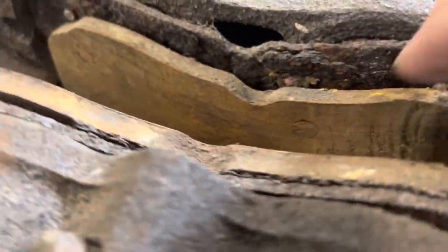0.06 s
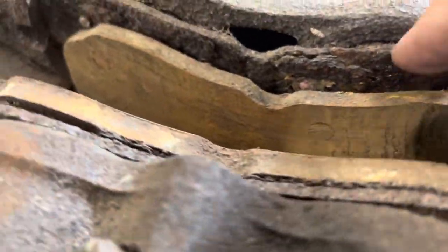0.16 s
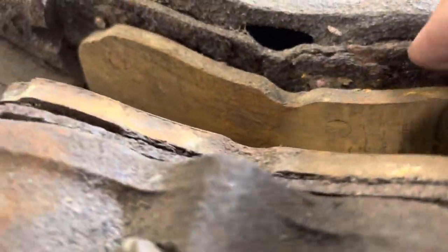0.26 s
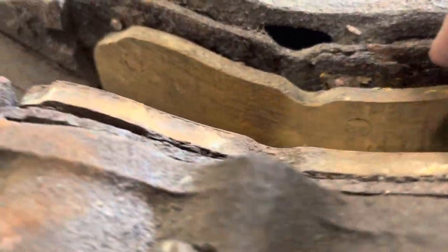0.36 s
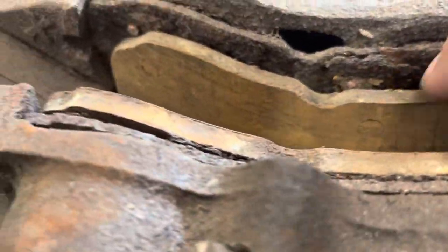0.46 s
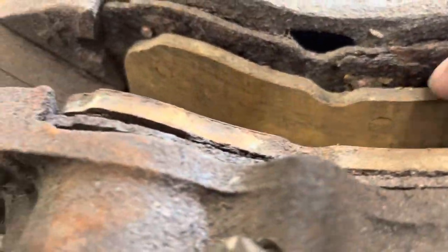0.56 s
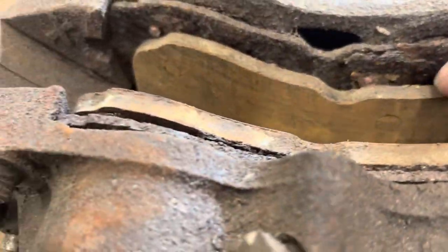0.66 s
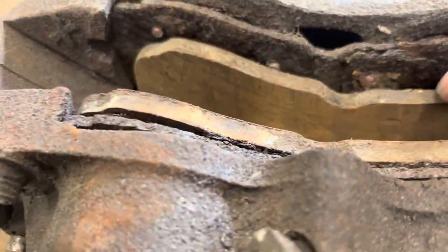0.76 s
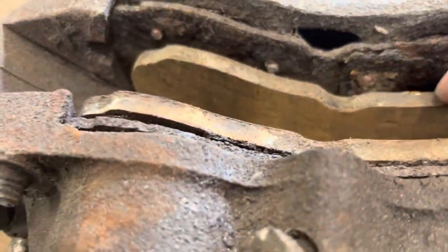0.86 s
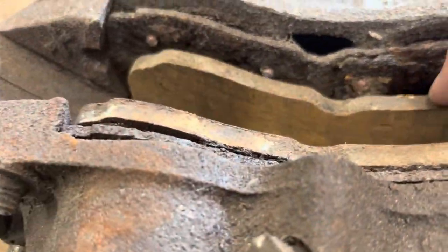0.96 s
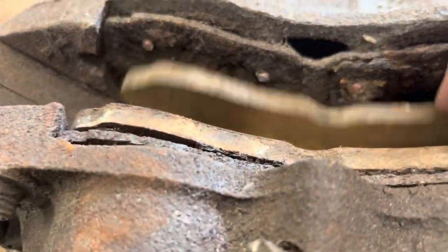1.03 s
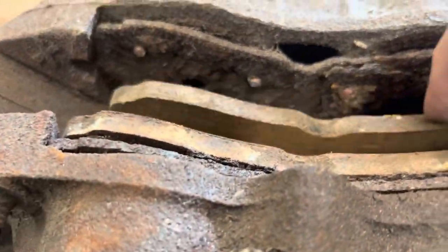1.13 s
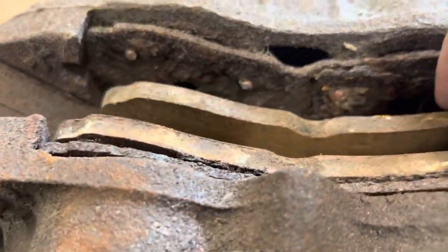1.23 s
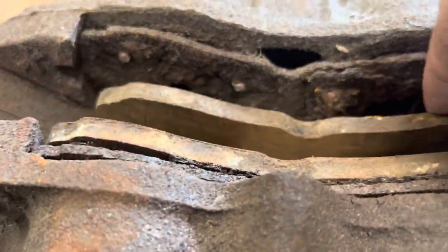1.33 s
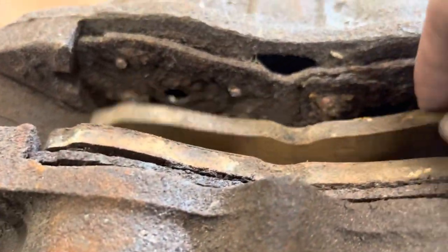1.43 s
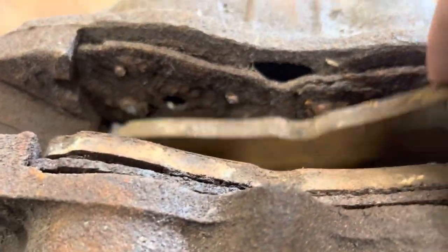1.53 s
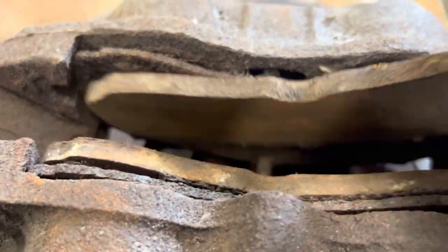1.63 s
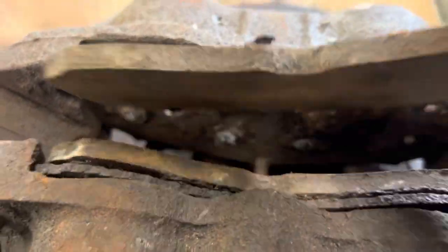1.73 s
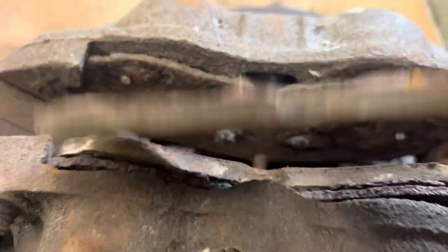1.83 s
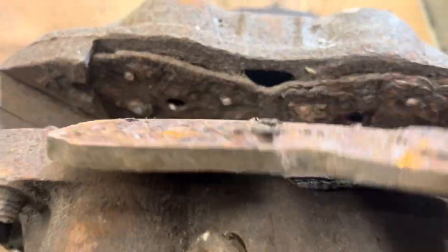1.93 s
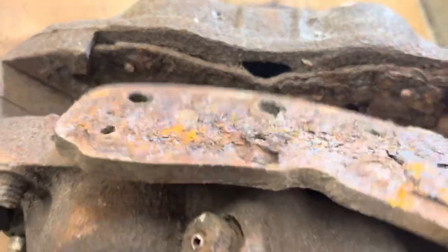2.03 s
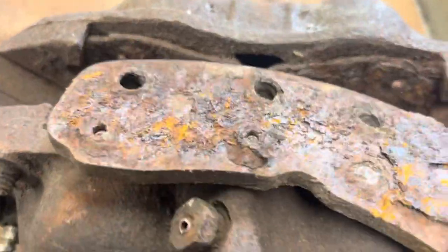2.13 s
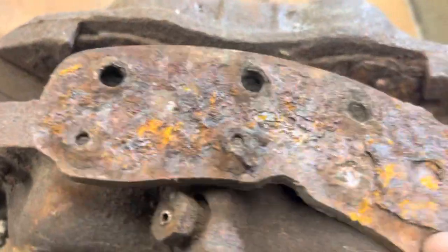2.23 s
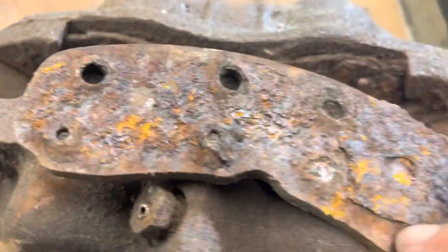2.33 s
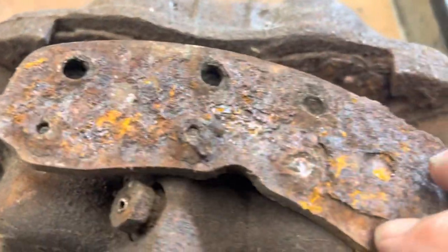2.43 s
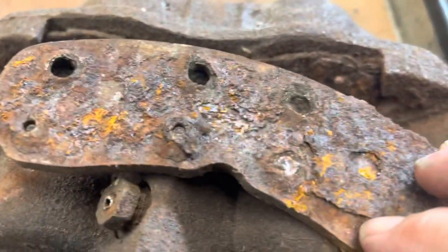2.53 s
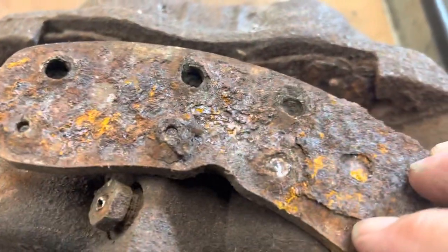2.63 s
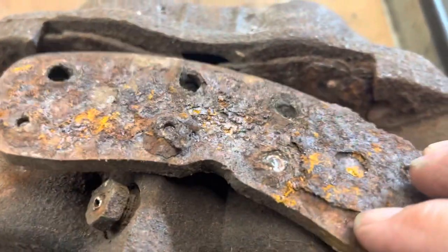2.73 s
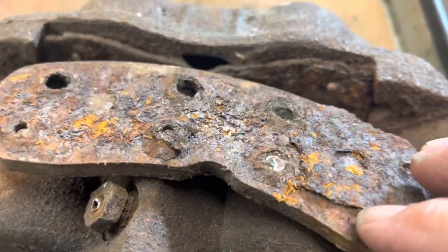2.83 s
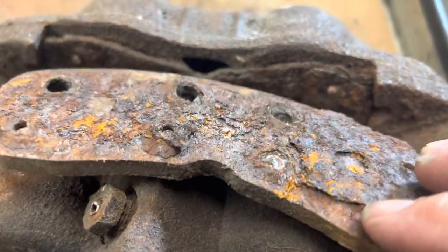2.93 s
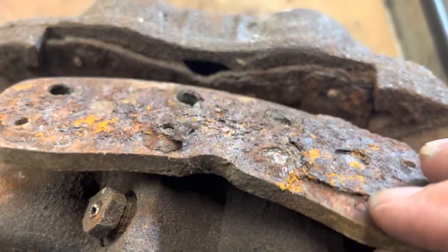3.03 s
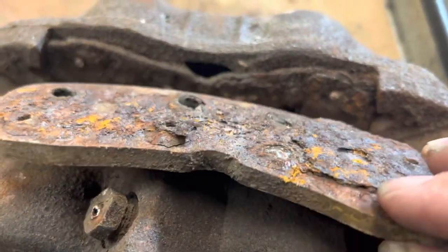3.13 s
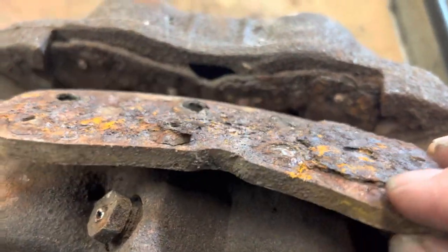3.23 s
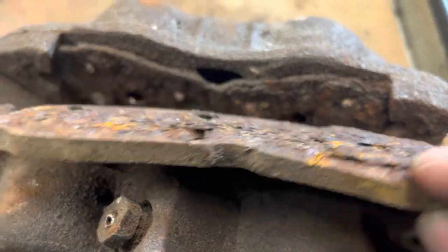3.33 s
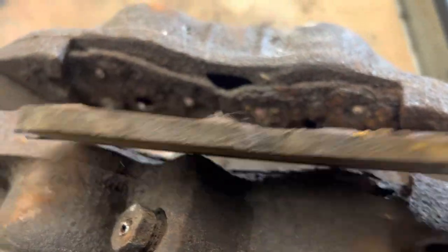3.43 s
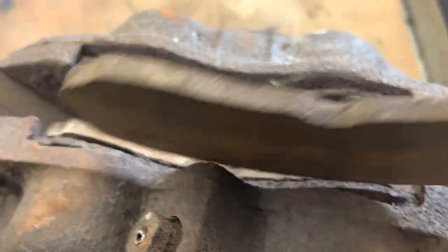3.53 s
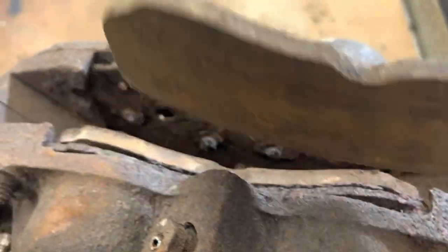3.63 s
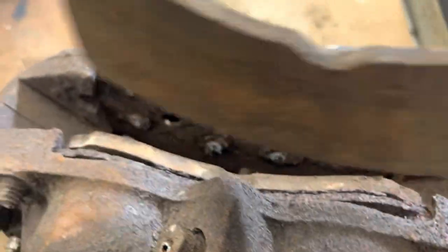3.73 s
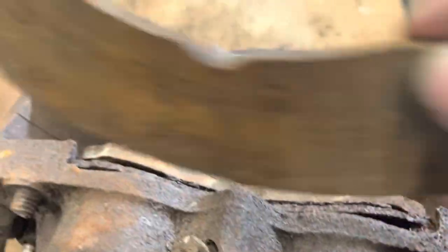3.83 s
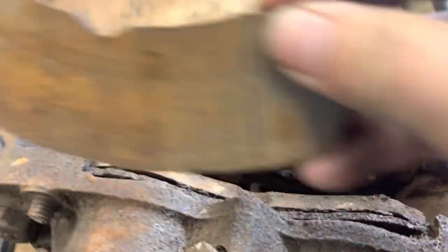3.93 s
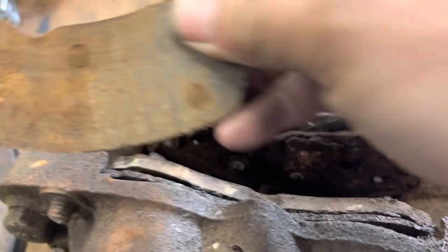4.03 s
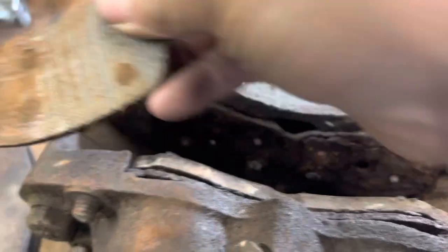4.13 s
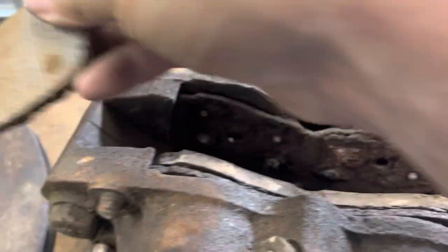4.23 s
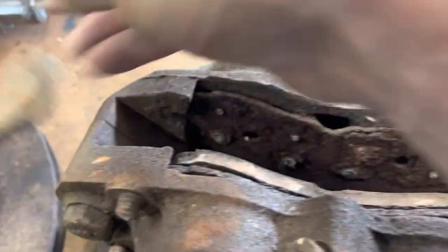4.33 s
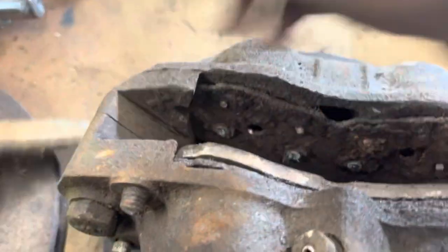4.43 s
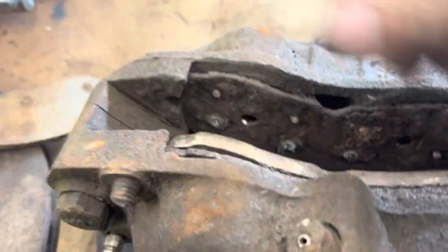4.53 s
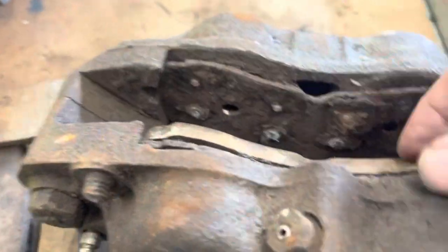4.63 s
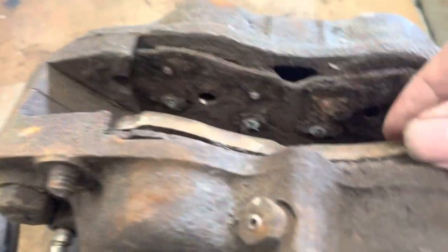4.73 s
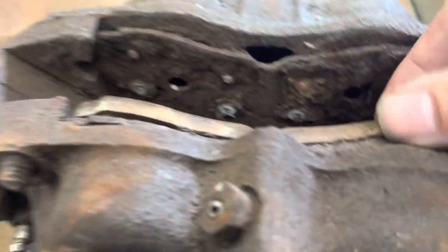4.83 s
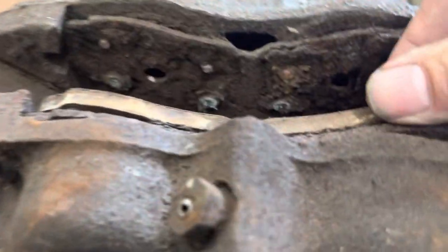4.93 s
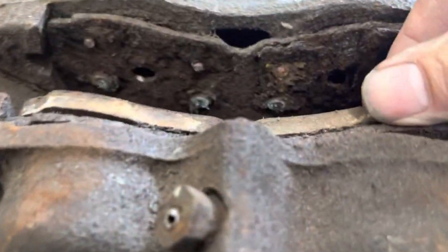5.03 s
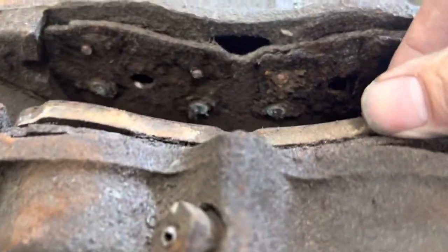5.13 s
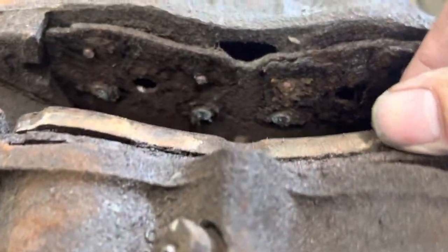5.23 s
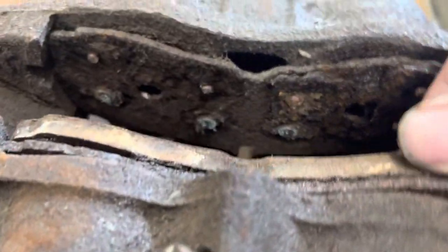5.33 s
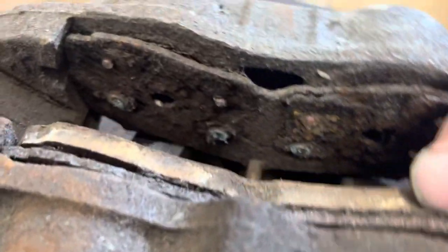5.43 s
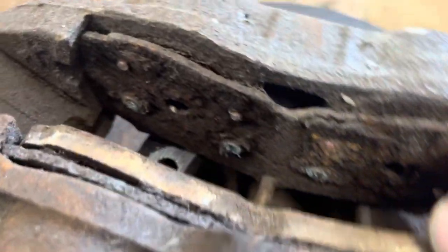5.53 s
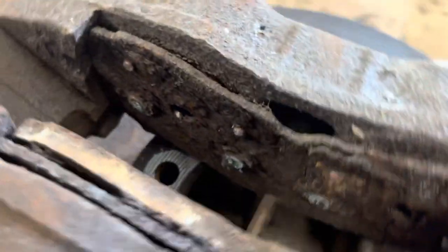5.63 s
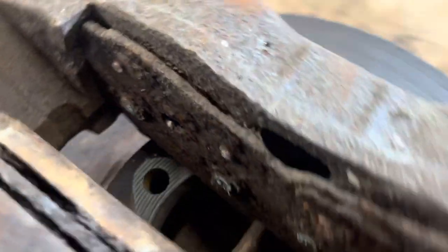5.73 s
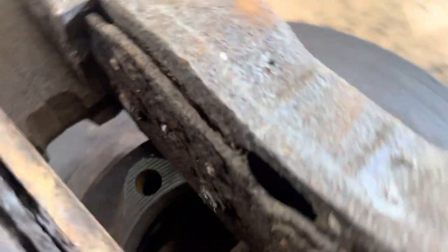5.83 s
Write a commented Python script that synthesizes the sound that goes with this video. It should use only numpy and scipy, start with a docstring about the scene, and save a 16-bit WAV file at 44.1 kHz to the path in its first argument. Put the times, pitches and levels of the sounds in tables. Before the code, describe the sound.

Small dry metal ticks and gritty rubs come from a hand-held pad right under the microphones, thickening into a cluster and one solid knock, then a few dull taps. After a mostly quiet gap the pad lands a little further off with a hard clack, a ringing second hit, quick rattles and a low bench thud. Faint touches end it over steady hum and hiss.

```python
"""A worn steel brake pad is worked out of a rusty caliper by hand: ticks, scrapes and dead knocks, close by.
It is then dropped on the bench, rings, chatters and comes to rest; a few light scrapes and taps follow.
Blows are noise sprays through resonant gains plus damped sine modes; scrapes are random grains, filtered.
A mains hum, low rumble and soft hiss run throughout."""
import sys
import numpy as np
from scipy import signal
from scipy.fft import rfft, irfft
from scipy.io import wavfile
from scipy.ndimage import uniform_filter1d

SR = 44100
rng = np.random.default_rng(int(sys.argv[2]) if len(sys.argv) > 2 else 0)


def file_out(sig):
    """Save sig as 16-bit WAV at sys.argv[1]."""
    # one column per channel
    cols = np.atleast_2d(sig).T
    # limit, then scale
    lim = np.clip(cols, -1, 1)
    pcm = np.round(lim * 32767).astype(np.int16)
    wavfile.write(sys.argv[1], SR, pcm)


N = 259043  # samples
HZ = np.fft.rfftfreq(4096, 1 / SR)  # grid of the filter gains
T = np.arange(SR * 3 // 5) / SR  # time after a blow [s]
# dropped pad lands: (time [s], clack level [dB], ring level [dB], ring centre [Hz],
# flatness [0 on edge to 1 on face], grit tick level [dB], thud level [dB])
PAD_LANDINGS = [(4.283, -11.5, -23.5, 3000, 0.033, -34, -18.5), (4.2955, -31, -39, 3000, .24, -42, -42),
                (4.3747, -13.5, -12, 1850, .95, -21, -17), (4.3825, -25, -45, 3500, 0.44, -28, -33),
                (4.4039, -15.5, -39, 3700, .99, -25.5, -31.5), (4.4557, -39, -42, 1500, 0.54, -54, -28),
                (4.4656, -40, -31, 2600, 0.82, -30.5, -47), (4.477, -50, -26.5, 2690, 0.74, -42, -44),
                (4.485, -41, -31, 2600, 0.76, -36, -20), (4.511, -57, -42.5, 1200, 1, -41, -54),
                (4.541, -42, -71, 2500, .4, -37, -26.5), (4.569, -37.5, -51, 1300, 0.49, -55, -36.5),
                (4.59, -52, -57, 1300, 0.82, -60, -33)]


def held_pad():
    """Fingers damp the pad: each tap is a dead knock, gritty tick and short ring; the casting thumps after."""
    # pad meets caliper: (time [s], knock level [dB], knock centre [Hz], grit tick level [dB],
    # ring level [dB], spot [0 at tip to 1 on flank])
    taps = [(0.285, -42, 1040, -58, -61, 0.78), (.691, -47, 676, -49, -50, .6),
            (.896, -40.5, 1330, -36.5, -59, .2), (0.915, -35, 1300, -32.5, -66, 0.12),
            (.942, -48, 1300, -40, -66, .2), (1.038, -45, 950, -43.5, -53, .9),
            (1.415, -56, 600, -42, -57, .5), (1.517, -58, 900, -36.5, -45.5, 0.63),
            (1.5497, -51, 700, -38.5, -46.5, 0.77), (1.585, -43, 910, -39, -49, 0.49),
            (1.6006, -34.5, 1150, -35, -32.5, 0), (1.636, -46, 1400, -45, -55, 0.33),
            (1.8489, -21.5, 774, -30, -36, 1), (1.968, -45, 500, -33, -55, .5),
            (1.9711, -33, 333, -46, -40, 0.75), (2.021, -35.5, 450, -55, -57, 0.78),
            (2.2326, -38.5, 1060, -45.5, -51, 0.73), (2.259, -32.5, 373, -51, -51, .9),
            (2.28, -47, 700, -58, -64, .8), (2.292, -41.5, 520, -56, -60, 0.71),
            (2.762, -38, 520, -48, -52, .6), (3.504, -41.5, 597, -51, -53, 0.75),
            (5.25, -46, 1400, -45.5, -62, 0.51), (5.401, -44.5, 400, -66, -58, .8)]
    # pad and casting pressed together: (frequency [Hz], level at tip [dB], level on flank [dB], t60 [s])
    joint_modes = [(231, -21, -5, .1), (400, -13, -9, .07), (592, -37, -8.5, 0.072),
                   (730, -5.5, -1.5, 0.082), (946, -33, -7.5, 0.082), (1086, -38, -11, 0.065),
                   (1390, -5, -8, 0.064), (1457, 4.5, -20, 0.04), (1705, 2.5, -27, 0.04),
                   (2363, -33, 7.5, 0.038), (2510, -16, -6.5, 0.096), (3800, 3.5, -26, 0.032),
                   (4370, -10, 1, 0.028), (5700, -9, -33, 0.033), (8200, -20, -8, 0.04),
                   (10300, 9.5, -21, 0.014)]
    lead = [(0, -2), (1550, -1.55), (3100, -8), (7490, -7), (13900, 4.5), (16500, 4)]  # stereo phase: (frequency [Hz], left lead [rad])
    side = [(60, -5), (150, 11), (380, 1), (950, 2), (2380, -3.5), (5980, -6), (15000, 5)]  # stereo level: (frequency [Hz], left over right [dB])
    # a glancing tap, more tick than knock, sounds brighter
    even_tick_hz, tick_db_per_octave = 6460, 27
    # the heavy casting rocks after each knock; a duller knock pushes it more
    thump_hz, thump_t60_s, thump_lag_s = 340, 0.14, 0.012
    thump_re_1khz_knock_db, thump_db_per_octave = -18, 6

    out = np.zeros((2, N))
    hz, tip_db, flank_db, t60_s = np.transpose(joint_modes)
    for s, knock_db, knock_hz, tick_db, ring_db, spot in taps:
        knock = contact(hump(knock_hz, q=0.86) ** 2, t60=0.028, likeness=0.88, tail_db=-27, tail_t60=0.11)
        mode_db = 20 * np.log10(blend(amp(tip_db), amp(flank_db), spot))
        clink = ring(hz, ring_db + mode_db, t60_s)
        tick_hz = even_tick_hz * 2 ** ((tick_db - knock_db) / tick_db_per_octave)
        grit = tick(tick_hz, t60=0.014)
        add(out, s, amp(knock_db) * knock + amp(tick_db) * grit + clink)

        thump = contact(hump(thump_hz, q=0.93) ** 2, thump_t60_s, likeness=0.94, tail_db=-24, tail_t60=0.18)
        duller_octaves = np.log2(1000 / knock_hz)
        thump_db = knock_db + thump_re_1khz_knock_db + thump_db_per_octave * duller_octaves
        add(out, s + thump_lag_s, amp(thump_db) * thump)
    return place(out, lead, side)


def scrapes():
    """Sliding steel catches on many rust grains of uneven size, which excite one resonance of the joint."""
    # slides over rust: (time [s], length [s], level [dB rms over sound and equal tail, plus 3], centre [Hz])
    rubs = [(.156, 0.064, -54, 990), (0.404, 0.044, -55, 3140), (0.416, 0.054, -52.5, 367),
            (0.557, .19, -55, 1980), (0.683, 0.017, -43, 694), (.932, 0.14, -60, 1490),
            (1.014, .018, -48.5, 3270), (2.075, .15, -59, 7000), (2.255, .09, -53.5, 1130),
            (3.409, 0.076, -57, 5000), (4.822, 0.066, -65, 2200), (5.401, 0.066, -60, 785),
            (5.604, 0.062, -54.5, 1210), (5.827, 0.042, -57.5, 1840)]
    # a slide of slip_s has Q 1; shorter slips stay on one spot and squeak more sharply
    slip_s, slip_power = 0.08, 1.22
    grains_per_s, grain_spread_db = 1500, 3.5
    catch_rms_db, catch_hz = 1.5, 70  # catch and slip: depth and rate of the unevenness

    out = np.zeros((2, N))
    catching = amp(catch_rms_db * drift(catch_hz))
    for s, length_s, db, hz in rubs:
        size = round(length_s * SR)
        q = (slip_s / length_s) ** slip_power
        grains = noise_pair(size, 0.3)
        hits = rng.random(size) < grains_per_s / SR
        grains *= hits * signal.windows.tukey(size, .6)
        grains *= amp(grain_spread_db * rng.standard_normal(size))
        grains *= np.roll(catching, -round(s * SR))[:size]
        with_tail = np.pad(grains, ((0, 0), (0, size)))
        sound = colour(with_tail, hump(hz, q) ** 2)
        add(out, s, amp(db) * unit(sound) / np.sqrt(2))
    return out


def dropped_pad():
    """Let go, the pad lands on its edge, falls on its face and chatters to rest, ringing freely."""
    # free pad: (frequency [Hz], level struck on edge [dB], level struck on face [dB], t60 [s])
    pad_modes = [(950, -18, -28, 0.046), (1106, -24, -17, .3), (1114, -20, 3, .15), (1117, -20, -9, .38),
                 (1613, -8, -16, 0.14), (1696, -16, -39, 0.45), (2250, -14, -22, 0.07),
                 (2411, -14, -2.5, .21), (2435, -30, -9, .25), (2812, 1, -17, .33), (2953, -1, -19, .19),
                 (2460, -28, -21, 0.054), (3420, -17, -33, 0.1), (3580, -27, -27, 0.11),
                 (3980, -32, -6, .11), (4180, -22, -14, .06), (4290, -10, -19, 0.09), (5340, -20, -9, 0.22),
                 (5800, -4.5, -24, 0.33), (5930, -20, -25, .25), (6205, -5, -29, 0.41),
                 (6450, -16, -23, 0.13), (7100, -13, -17, 0.25), (8160, -16, 0, 0.06)]
    # steel and bench touching: (frequency [Hz], width [Hz], level on edge [dB], level on face [dB])
    clack_modes = [(800, 75, -2.5, -7), (896, 42, -2, 5.5), (1490, 280, -11, -12), (2226, 120, -.5, -2),
                   (2680, 190, -14, -2), (3080, 300, -2, -12), (3550, 140, -29, -6.5),
                   (4250, 160, -1.5, -2.5), (6330, 390, -4, -9.5), (8150, 430, -28, -22)]
    lead = [(0, 1), (1720, 1.5), (2150, 1), (4910, -0.5), (6370, 7.5), (7240, 6), (11100, 11.5),
            (15100, 17.5), (16100, 14), (16500, 31)]  # stereo phase: (frequency [Hz], left lead [rad])
    side = [(60, -9), (99, 1.0), (160, -0.5), (270, -10), (450, -23), (740, 1.5), (1220, -1), (2010, 0),
            (3330, -4.5), (5500, -9), (9080, -4), (15000, -4)]  # stereo level: (frequency [Hz], left over right [dB])
    edge_t60_s, face_t60_s = 0.016, 0.022  # a flat landing chatters longer
    # lighter landings stay longer in contact and lose treble
    full_blow_hz, softer_db_per_octave = 28000, 13
    small_plate_hz = 560  # so small a plate radiates little below this
    # grit ticks higher as the clack gets weaker
    hard_tick_hz, tick_rise_hz_per_db = 5000, 125

    out = np.zeros((2, N))
    hz, edge_db, face_db, ring_t60_s = np.transpose(pad_modes)
    radiated = 1 / np.hypot(1, (small_plate_hz / (HZ + 1)) ** 2)
    for s, clack_db, ring_db, centre_hz, flat, tick_db, _ in PAD_LANDINGS:
        favoured_db = 20 * np.log10(np.interp(hz, HZ, hump(centre_hz, q=1.5)))
        clang = ring(hz, ring_db + favoured_db + blend(edge_db, face_db, flat), ring_t60_s)

        body = resonances([(f, width, blend(on_edge, on_face, flat))
                           for f, width, on_edge, on_face in clack_modes])
        soft_hz = full_blow_hz * 2 ** (clack_db / softer_db_per_octave)
        softness = 1 / np.hypot(1, HZ / soft_hz) ** 2
        clack_t60_s = blend(edge_t60_s, face_t60_s, flat)
        clack = contact(body * softness * radiated, clack_t60_s, likeness=0.77, tail_db=-25, tail_t60=0.22)

        grit = tick(hard_tick_hz - tick_rise_hz_per_db * clack_db, t60=0.037)
        landing = clang + amp(clack_db) * clack + amp(tick_db) * grit
        add(out, s, landing, pan_db=4.5)  # ahead of the stereo placing
    return place(out, lead, side)


def bench():
    """Each landing pushes the bench top; its lowest modes boom, the deepest arriving last."""
    # bench top: (frequency [Hz], level [dB], t60 [s])
    bench_modes = [(76, 1, 0.066), (97, -4.5, 0.075), (130.3, 1, .17), (197, -11, 0.14), (266, 1.5, 0.084)]
    push_hz = 240  # the heavy pad pushes slowly and reaches little above this
    # bending waves take this long at this pitch; lower ones travel slower
    bend_delay_s, bend_hz = 0.00726, 130

    out = np.zeros((2, N))
    hz, mode_db, t60_s = np.transpose(bench_modes)
    push_db = -10 * np.log10(1 + (hz / push_hz) ** 4)
    boom = ring(hz, mode_db + push_db, t60_s) * (1 - np.exp(-T / .002))
    for s, *_, thud_db in PAD_LANDINGS:
        add(out, s, amp(thud_db) * boom, pan_db=2.5)

    f = np.fft.rfftfreq(N, 1 / SR)
    bend_phase = 2 * np.pi * 2 * bend_delay_s * np.sqrt(bend_hz * f)
    out = irfft(rfft(out) * np.exp(-1j * bend_phase), N)
    # the board radiates little outside the range of its modes
    return signal.sosfilt(signal.butter(3, [50, 330], "bandpass", fs=SR, output="sos"), out)


def workshop():
    """A wavering mains hum and low rumble, slightly stronger on the left, under even hiss."""
    air_points = [(20, -26), (40, -17), (62, 0), (90, -3), (125, -4), (155, -5.5), (240, -10.5),
                  (290, -17.5), (450, -19.5), (700, -19.5), (950, -21.5), (2500, -28), (7500, -24.5),
                  (10000, -51)]  # room noise: (frequency [Hz], relative density [dB])
    hiss_points = [(7000, -11.5), (9500, -5), (11000, 10.5), (12500, 12.5), (14000, 2.5), (16000, 4)]  # high hiss: (frequency [Hz], relative density [dB])
    hum_tones = [(120, -45), (240, -61.5)]  # mains hum: (frequency [Hz], level [dB rms before the 0.6 dB tilt to the left])
    # noise at both microphones: (frequency [Hz], left-right likeness [-1 to 1])
    likeness_points = [(60, 0.84), (150, 0.88), (380, 0.6), (950, 0), (2380, 0.3), (5980, 0.07),
                       (15000, 0.23)]
    air_db = -54.5  # rms above 400 Hz, before the 0.6 dB tilt to the left

    f = np.fft.rfftfreq(N, 1 / SR)
    a, b = rfft(rng.standard_normal((2, N)))
    c = np.clip(read(likeness_points, f), -1, 1)
    pair = np.array([a, c * a + np.sqrt(1 - c * c) * b])
    air = pair * amp(read(air_points, f))
    air_rms = irfft(air * (f > 400), N).std()
    rumble = amp(air_db) * irfft(air, N) / air_rms
    hiss = amp(-61) * unit(irfft(pair * amp(read(hiss_points, f)), N))

    wavering_s = np.arange(N) / SR + 0.00023 * drift(rate_hz=1.34)
    hum = sum(amp(db) * np.sqrt(2) * np.sin(2 * np.pi * hz * wavering_s) for hz, db in hum_tones)
    hum = hum * amp(1.7 * drift(rate_hz=2.7))
    left_tilt = amp([[.6], [-.6]])
    return (rumble + hum) * left_tilt + hiss


def room(x, t60, wet_db):
    """A weak, dull reverberation from the walls: decaying noise that starts 6 ms late."""
    decay = amp(-60 * T / t60) * (T > .006)
    tail = colour(noise_pair(len(T), 0.12) * decay, hump(1200, q=.4))
    return amp(wet_db) * signal.oaconvolve(x, tail / np.linalg.norm(tail[0]), axes=1)[:, :N]


def contact(gain, t60, likeness, tail_db, tail_t60):
    """Rough faces meet in a quick spray of tiny blows with a faint scattered tail; peak short-term rms 1."""
    meet_s = 0.00034  # time constant of the faces meeting
    decay = amp(-60 * T / t60) + amp(tail_db - 60 * T / tail_t60)
    spray = noise_pair(len(T), likeness) * decay
    sound = colour(spray * (1 - np.exp(-T / meet_s)), gain)
    return sound / np.sqrt(uniform_filter1d((sound ** 2).mean(0), size=160).max())


def tick(hz, t60):
    """Flakes of rust crack at the point of contact; the microphones roll off the top treble."""
    top_rolloff = 1 / np.sqrt(1 + (HZ / 13500) ** 12)
    gain = hump(hz, q=0.75) * hump(6700, q=0.11) * top_rolloff
    return contact(gain, t60, likeness=1.0, tail_db=-24, tail_t60=0.18)


def ring(hz, db, t60):
    """Modes set going by one blow, each dying at its own speed."""
    decay = amp(db[:, None] - 60 * T / t60[:, None])
    return (np.sin(2 * np.pi * hz[:, None] * T) * decay).sum(0)


def resonances(modes):
    """Gain over frequency of a set of damped resonances, summed in power."""
    f = HZ + 1
    return np.sqrt(sum(amp(db) ** 2 / (1 + ((f * f - hz * hz) / (f * width)) ** 2) for hz, width, db in modes))


def hump(hz, q):
    """Gain of one broad band around hz."""
    return 1 / np.sqrt(1 + (q * ((HZ + 1) / hz - hz / (HZ + 1))) ** 2)


def colour(x, gain):
    """Minimum-phase filter of the given gain, peak 1: nothing sounds before the blow."""
    log_gain = np.log(np.maximum(gain / gain.max(), 1e-4))
    circle = np.r_[log_gain, log_gain[-2:0:-1]]
    impulse = np.fft.ifft(np.exp(np.conj(signal.hilbert(circle)))).real
    return signal.oaconvolve(x, impulse[None, :len(HZ)], axes=1)[:, :x.shape[1]]


def noise_pair(size, likeness):
    """White noise at two microphones that partly agree."""
    a, b = rng.standard_normal((2, size))
    c = np.clip(likeness, 0, 1)
    return np.array([a, c * a + np.sqrt(1 - c * c) * b])


def drift(rate_hz):
    """Slow random wandering, rms 1."""
    f = np.fft.rfftfreq(N, 1 / SR)
    return unit(irfft(rfft(rng.standard_normal(N)) * np.exp(-(f / rate_hz) ** 2), N))


def place(x, lead, side):
    """A close source reaches the two microphones with different phase and level."""
    f = np.fft.rfftfreq(N, 1 / SR)
    half = amp(read(side, f) / 2) * np.exp(.5j * np.interp(f, *np.transpose(lead)))
    pair = np.array([half, 1 / half])
    return irfft(rfft(x) * pair / np.sqrt((abs(pair) ** 2).mean(0)), N)


def add(mix, s, sound, pan_db=0):
    """Lays a sound into the mix at its time and side (positive pan is left)."""
    part = mix[:, round(s * SR):][:, :sound.shape[-1]]
    part += (sound * amp([[pan_db / 2], [-pan_db / 2]]))[:, :part.shape[1]]


def read(points, hz):
    """A spectrum joined by straight lines on a log-frequency axis."""
    f, value = np.transpose(points)
    return np.interp(np.log(hz + 1), np.log(f + 1), value)


def blend(a, b, share):
    """From a at share 0 to b at share 1."""
    return a + np.clip(share, 0, 1) * (b - a)


def unit(x):
    """Scales to rms 1."""
    return x / np.sqrt(np.mean(x ** 2) + 1e-20)


def amp(db):
    """Decibels to amplitude."""
    return 10 ** (np.asarray(db) / 20)


def scene():
    """The caliper is right under the microphones; the pad falls a little further off."""
    near = held_pad() + scrapes()
    further = dropped_pad()
    near_room = room(near, t60=0.16, wet_db=-23)
    further_room = room(further, t60=0.36, wet_db=-16.5)
    return near + near_room + further + further_room + bench() + workshop()


def record(dry):
    """Linear-phase low-pass: the band ends at 16.3 kHz."""
    low_pass = signal.firwin(511, 16300, window=("kaiser", 9), fs=SR)
    return signal.oaconvolve(dry, low_pass[None], "same")


dry = scene()
out = record(dry)
file_out(out)
```